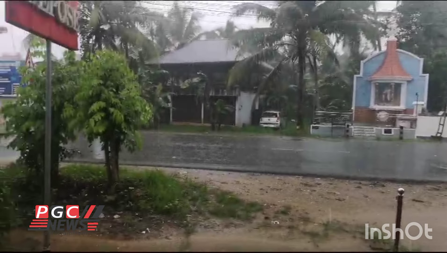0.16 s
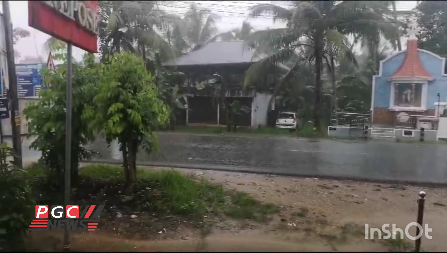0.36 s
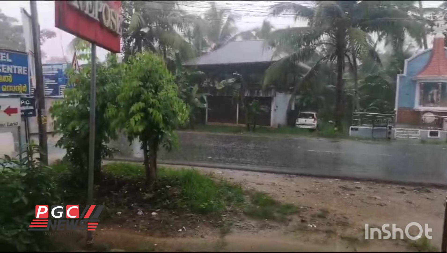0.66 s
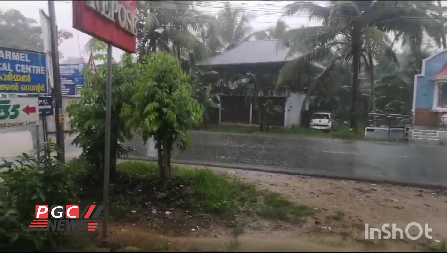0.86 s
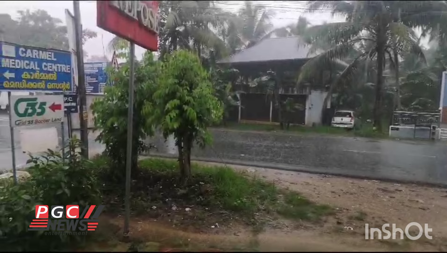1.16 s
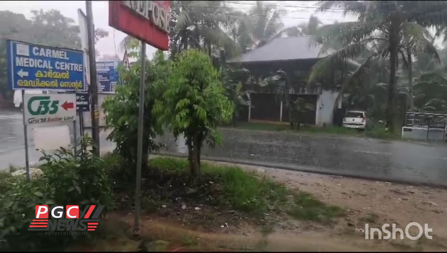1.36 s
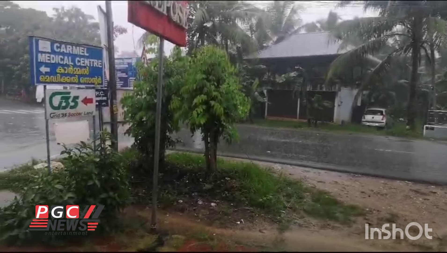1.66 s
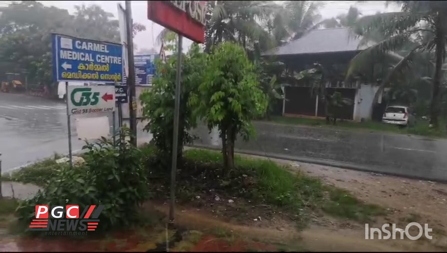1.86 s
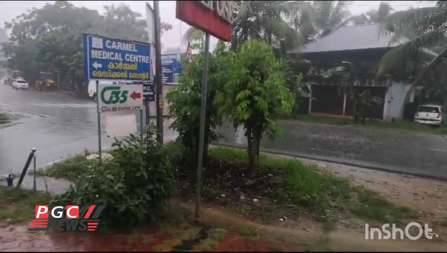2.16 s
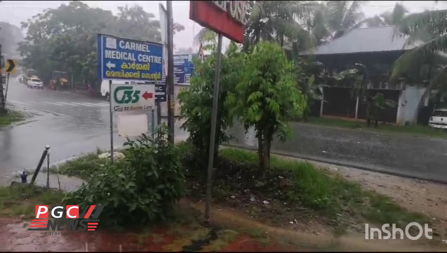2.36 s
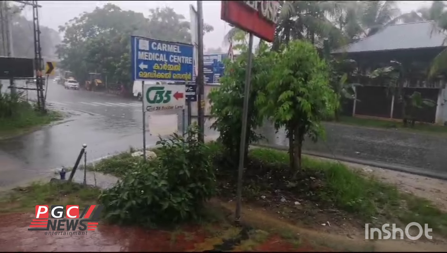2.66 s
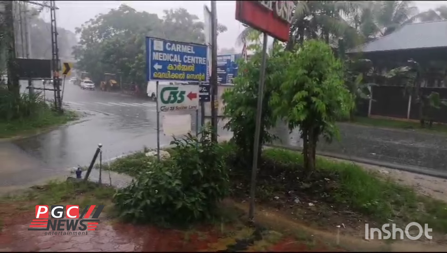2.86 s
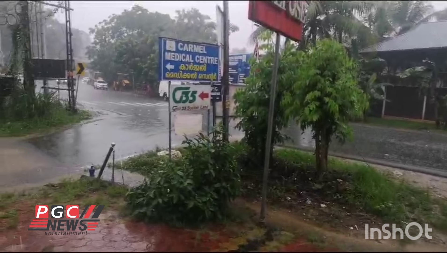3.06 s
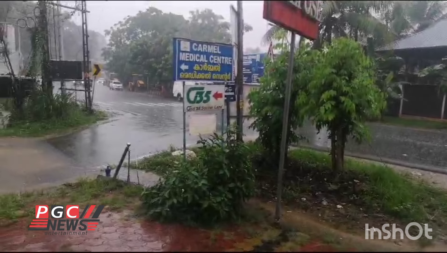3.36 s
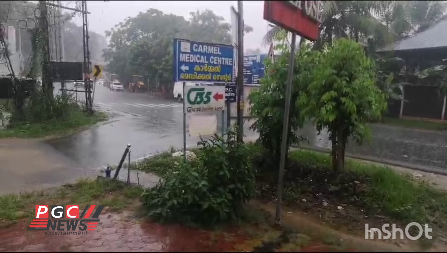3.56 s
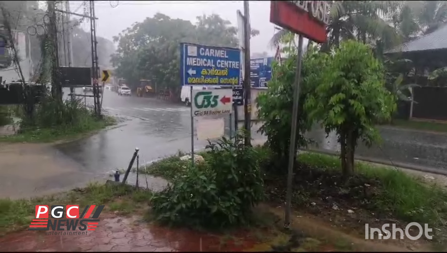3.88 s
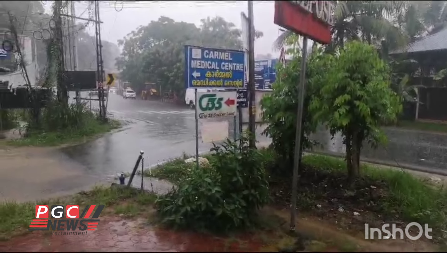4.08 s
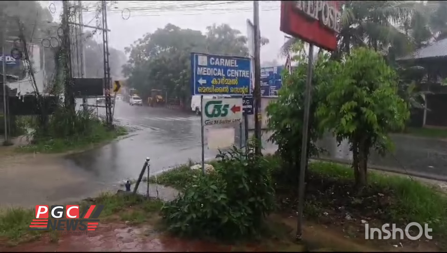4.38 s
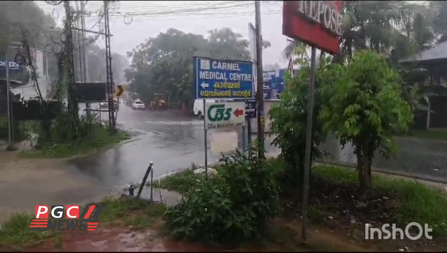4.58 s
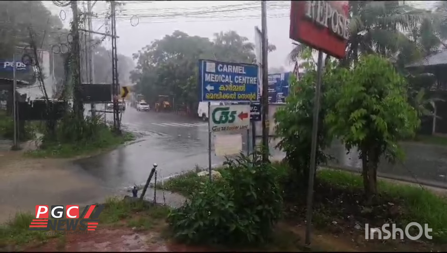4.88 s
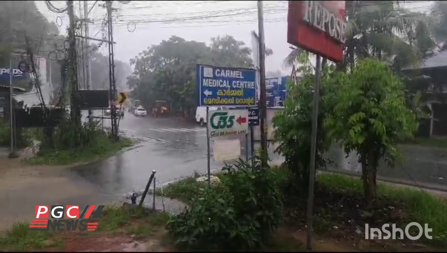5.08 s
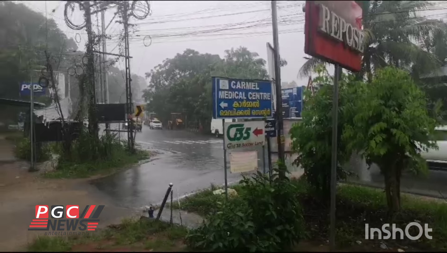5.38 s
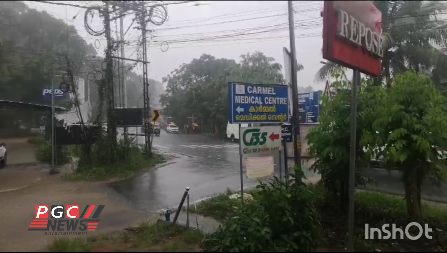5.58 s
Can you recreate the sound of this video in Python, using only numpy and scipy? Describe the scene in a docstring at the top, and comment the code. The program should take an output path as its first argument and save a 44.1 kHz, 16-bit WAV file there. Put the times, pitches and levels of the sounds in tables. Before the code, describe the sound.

Heavy rain hisses over a road junction with crisp nearby drips and spatter, while a car swishes past on the wet road.

```python
"""Heavy rain at a road junction

Heard from the edge of a paved yard. Filtered noise makes the wash of countless far drops; short rings
make the nearer patter and the taps on leaves. Ticks of noise spatter nearby, and fat drops ping, crack and spray.
A car passes as wet tyre hiss with a short echo, thrown puddle water and a duller roar from the tread.
Below lie a low traffic rumble and a few puffs of wind that thump at the microphone.
"""
import sys
import numpy as np
from scipy import signal
from scipy.fft import rfft, irfft
from scipy.io import wavfile
from scipy.ndimage import map_coordinates

SR = 44100
rng = np.random.default_rng(int(sys.argv[2]) if len(sys.argv) > 2 else 0)


def dump_mix(stems):
    """Bounce the given channels to the path in sys.argv[1] as a 16-bit WAV at rate SR."""
    frames = np.atleast_2d(stems).T  # one column per channel
    limited = np.clip(frames, -1, 1)  # hard clip at full scale
    pcm = np.round(limited * 32767).astype(np.int16)
    wavfile.write(sys.argv[1], SR, pcm)


N = 252693
TIME = np.arange(N) / SR   # s
HZ = np.maximum(np.arange(N // 2 + 1) * SR / N, 1)   # never 0, so its logarithm exists

# Tone of rain on road, earth and leaves: (frequency [Hz], left level per Hz [dB], right level per Hz [dB])
RAIN_TONE = [(200, -9, -9.5), (500, -12, -10.5), (810, -7.5, -8), (1190, -5.5, -4.5), (1400, -9, -6.5),
             (1636, -1.5, -3), (2650, -6, -0.5), (3000, -9.5, -6), (5130, -12.5, -11.5), (6400, -15, -14.5),
             (7300, -15.5, -15.5), (8400, -15.5, -18), (10250, -22, -21.5), (15200, -33, -31.5)]
# How the nearer drops thicken and thin out: (time [s], level change [dB])
PATTER_LEVEL = [(0, -0.5), (.4, 2.5), (.46, -1), (.56, -10), (.62, 0), (1.85, 1), (1.98, 2), (5.7, 0.5)]
# The fattest drops close by: (time [s], level [dB], pitch [Hz], ring length [cycles],
# crack against ping [dB], spray against ping [dB], right minus left [dB])
FAT_DROPS = [(.0357, -21, 6000, 4, 3, -22, 2), (.0413, -22, 4100, 9.2, -6, -28, 4),
             (.055, -24, 3800, 5, 1, -28, 7), (.2689, -10.5, 3900, 3.7, -5, -20, 3),
             (.3011, -20, 5500, 12, -6, -25, 1), (.3414, -23, 4100, 5, 1, -24, 0),
             (.3539, -20, 3800, 10, -7, -27, -1), (.3657, -21, 7500, 6, 2, -22, -2),
             (.3703, -14, 3400, 5.7, -3, -22, 3), (.593, -19, 7600, 6, 2, -31, -3),
             (.6599, -22, 4800, 6, 0, -22, 7), (.7987, -21, 4880, 14, -4, -21, 4),
             (.9832, -20, 3300, 7.6, -4, -20, 4), (1.0013, -26, 4600, 9, -5, -22, 2),
             (1.0663, -21, 7000, 4.3, 2, -26, 0), (1.173, -25, 3900, 19, -7, -28, 1),
             (1.1952, -15.5, 3400, 7.7, -11, -24, 8), (1.2871, -22, 7500, 7, -1, -25, -3),
             (1.3154, -18, 3100, 7.1, -4, -28, 5), (1.4232, -22, 7200, 6, -1, -17, 4),
             (1.4809, -19, 4400, 6.4, -2, -20, 6), (1.5574, -15, 3670, 10, -17, -32, 5),
             (1.6052, -24, 3100, 8.9, -2, -27, 4), (1.8049, -13, 5000, 9, 7, -15, 0),
             (1.8134, -17, 3450, 8, 2, -19, -2), (1.8164, -19, 6900, 6, 3, -20, 3),
             (1.9459, -21, 6200, 6.5, -1, -12, 3), (2.0819, -21, 3800, 6, 1, -23, 3),
             (2.2587, -22, 4100, 6, -3, -25, 2), (2.3551, -13, 3000, 6.8, -16, -32, 1),
             (2.3778, -19, 3000, 6, -3, -24, 5), (2.5591, -20, 3200, 5.7, 1, -26, 2),
             (2.6254, -20, 4200, 6, 0, -24, 3), (2.7699, -19, 6000, 7, -3, -19, 6),
             (3.113, -14, 3700, 11, -17, -35, -2), (3.2985, -17, 3200, 8.1, -8, -28, 4),
             (4.5565, -17, 4400, 8, -3, -27, -1), (5.3979, -16.5, 2920, 9.2, -11, -28, 1)]
# Tone of tyres throwing up water: (frequency [Hz], left level per Hz [dB], right level per Hz [dB])
TYRE_TONE = [(500, -40, -18), (1230, -17.5, -16), (1670, -8.5, -6.5), (2190, 1, 1.5), (2720, -11, 1.5),
             (3360, -7, -1.5), (3800, -7, -6.5), (4900, -5.5, -3), (6300, -8, -6), (7200, -9, -8.5),
             (8700, -11.5, -11), (10630, -17.5, -17.5), (12400, -29, -19.5), (14900, -36, -39)]
# Short echo of the car, a row each for left and right:
# (delay with the car straight ahead [ms], shift at the end of the road [ms])
ECHO_DELAYS = [(0.197, -0.049), (0.2, 0.038)]
# Water thrown up from puddles by the wheels: (time of middle [s], half length [s], level [dB], pitch [Hz])
PUDDLE_SHEETS = [(3.41, 0.38, -36.5, 3950), (3.23, 0.28, -37, 2250), (3.76, 0.21, -37.5, 1860),
                 (3.74, .08, -47, 11000), (4.43, 0.23, -33, 2410), (4.76, 0.25, -38, 7800),
                 (4.34, 0.26, -39.5, 2870), (4.56, 0.043, -37, 2640), (5.03, 0.13, -33, 2570),
                 (5.42, 0.26, -37, 2750), (4.9, .2, -48, 4200), (5.6, .03, -34, 1840)]
# Tone of far traffic: (frequency [Hz], level per Hz [dB])
TRAFFIC_TONE = [(11, -13), (18, 0), (38, -1), (65, -4), (97, -2), (124, -7), (162, -6.5), (236, -9),
                (263, -9), (450, -18.5), (580, -50), (990, -120)]
# Puffs of wind on the microphone:
# (time [s], peak of the eddy [dB], half width of the eddy [s], turbulence level [dB])
WIND_PUFFS = [(.48, -30, .004, -39), (.571, -28, .0025, -44), (0.6, -17, 0.0024, -32),
              (.622, -33, .003, -38), (.661, -28, .004, -36), (0.691, -24.5, 0.003, -39),
              (.755, -22.5, 0.0043, -33), (.852, -30, .004, -47), (0.887, -22, 0.0041, -31),
              (0.918, -25, 0.0039, -39), (0.944, -37, 0.0021, -39), (.968, -27, 0.0035, -41),
              (1.052, -35, 0.0018, -35), (1.072, -26, 0.0032, -41), (1.098, -27.5, 0.0026, -42),
              (1.122, -32, .006, -43), (1.409, -34, 0.0044, -45), (1.47, -33, .005, -37),
              (2.66, -34, 0.008, -49), (5.46, -34, .006, -45)]
# Narrow resonances and notches of the two microphone ports:
# (frequency [Hz], width [Hz], left change [dB], right change [dB])
PORT_TONES = [(3870, 560, -1.5, 2.7), (5740, 460, 0, 3), (6920, 670, 3, 3.5), (7600, 480, 4.5, 4),
              (8520, 470, 1.7, -8.5), (9300, 490, 4, 1), (10300, 2700, -6, -1)]
# Low-middle band where the stereo image widens: (frequency [Hz], width [Hz], change of the side signal [dB])
STEREO_WIDENING = (560, 430, 2.9)

# Lesser drops that fall at random among the fattest
STRAY_PER_S, STRAY_CYCLES = 6, 7.3
STRAY_DB, STRAY_SPREAD_DB = -25, 4
STRAY_CRACK_DB, STRAY_SPRAY_DB = 0, -22   # against the ping
STRAY_LOW_HZ, STRAY_HIGH_HZ = 2800, 7000
# The car drives by at a steady speed
CAR_NEAREST_S, CAR_SPEED_M_PER_S, CAR_DISTANCE_M = 4.38, 13.8, 17.4
CAR_DB, CAR_FALL_DB_PER_DOUBLING = -28, 8   # level when nearest, and loss each time the distance doubles
ECHO_FAR, ECHO_NEAR = 0.071, 0.28   # echo strength, as a share of the hiss
PUFF_ATTACK_S, PUFF_RELEASE_S = 0.021, 0.066
CUTOFF_HZ = 15200


def from_db(db):
    """Turn decibels into a plain multiplier."""
    return 10 ** (np.asarray(db) / 20)


def rms_one(x):
    """Scale a sound so that its average power is 1."""
    return x / np.sqrt(np.mean(x ** 2) + 1e-20)


def in_time(rows):
    """Draw straight lines between the rows, giving each column a value at every sample."""
    s, *columns = np.transpose(rows)
    return np.array([np.interp(TIME, s, column) for column in columns])


def butter(x, edge_hz, kind, order=2):
    """Filter away what lies outside the chosen band, with a smooth slope."""
    edge_hz = np.clip(edge_hz, 10, .45 * SR)
    sections = signal.butter(order, edge_hz, kind, fs=SR, output="sos")
    return signal.sosfilt(sections, x + 1e-18)


def colour(x, spectrum):
    """Shape a steady sound's tone with one curve, or one for each side; average power 1."""
    hz, *columns = np.transpose(spectrum)
    gain = from_db([np.interp(np.log(HZ), np.log(hz), column) for column in columns])
    return rms_one(irfft(rfft(x) * gain, N))


def drift(per_s):
    """Wander slowly and at random around zero, with a typical swing of 1."""
    spectrum = rfft(rng.standard_normal(N))
    return rms_one(irfft(spectrum / (1 + (HZ / per_s) ** 2), N))


def ring(clicks, hz, cycles):
    """Let each click start a sine wave that dies by 60 dB within the given number of cycles."""
    turn = 2 * np.pi * min(hz, .45 * SR) / SR   # angle per sample
    decay = np.exp(-np.log(1000) * hz / (cycles * SR))   # left after each sample
    return signal.lfilter([0, np.sin(turn)], [1, -2 * decay * np.cos(turn), decay * decay], clicks + 1e-18)


def impacts(per_s, spread_db, low_hz, high_hz, cycles, surge_db, count=14):
    """Land ringing drops at random, each with its own size, pitch and direction; average power 1."""
    chance = per_s * from_db(surge_db * drift(5)) / SR
    born = np.flatnonzero(rng.random(N) < chance)
    size, pitch, bearing, sign = rng.random((N, 4))[born].T
    rarity = np.minimum(-np.log(1 - size), 4.5)   # many small drops, few large ones
    size = from_db(spread_db * rarity) * np.sign(sign - .5)
    lag = ((2 * bearing - 1) * .0004 * SR).astype(int)   # travel time between the two ports, in samples
    group = (pitch * count).astype(int)
    out = np.zeros((2, N))
    for k, hz in enumerate(np.geomspace(low_hz, high_hz, count)):
        mine = group == k
        clicks = np.zeros((2, N))
        clicks[0, born[mine]] = size[mine]
        clicks[1, (born[mine] + lag[mine]) % N] = size[mine]
        out += ring(clicks, hz, cycles)
    return rms_one(out)


def rain(wash_db=-32.0, patter_db=-40.5):
    """Far drops merge into a smooth wash of noise; nearer ones ring briefly as a patter on top."""
    wash = colour(butter(rng.standard_normal((2, N)), 290, "high"), RAIN_TONE)
    near = impacts(per_s=1700, spread_db=1.0, low_hz=3200, high_hz=10900, cycles=7.3, surge_db=2.0)
    patter = colour(butter(near, 2700, "high"), RAIN_TONE)
    return from_db(wash_db) * wash + from_db(patter_db + in_time(PATTER_LEVEL)) * patter


def fat_drops(crack_s=.0006, spray_rise_s=0.0037, spray_s=0.027, droplets_per_s=3500):
    """Each drop cracks and slaps on the paving, then its crown of droplets falls back as a short spray."""
    out = np.zeros((2, N))
    t = TIME[:SR // 8]
    for s, level_db, hz, cycles, crack_db, spray_db, pan_db in list(FAT_DROPS) + stray_drops():
        burst = rng.standard_normal((2, len(t))) * np.exp(-t / crack_s)
        burst = butter(burst, [1500, 8600], "band", order=3)
        crack = from_db(crack_db) * burst / np.abs(burst).max(axis=1, keepdims=True)

        landed = rng.random(len(t)) < droplets_per_s / SR
        droplets = rms_one(butter(rng.standard_normal((2, len(t))) * landed, [2800, 7500], "band"))
        falling = (1 - np.exp(-t / spray_rise_s)) * np.exp(-t / spray_s)
        spray = from_db(spray_db) * droplets * falling

        start = int(s * SR)
        sides = from_db(level_db + np.array([[-pan_db], [pan_db]]) / 2)
        splash = sides * (slap(t, hz, cycles) + crack + spray)
        out[:, start:start + len(t)] += splash[:, :N - start]
    return butter(out, 2250, "high")


def slap(t, hz, cycles, glide_share=0.15):
    """A drop dents the water film: a ping that swells, rises a little in pitch and dies within some cycles."""
    age = t * hz / cycles   # 1 at the end of the ring
    swell = 12 * age
    glide = 1 + glide_share * (np.minimum(age, 1) - .5)
    return np.sin(2 * np.pi * hz * t * glide) * swell * np.exp(1 - swell)


def stray_drops(pan_db=2, pan_spread_db=5):
    """Lesser drops fall at random moments, given as rows like those of the fattest."""
    when, size, pitch, place = rng.random((int(STRAY_PER_S * N / SR), 4)).T
    times = when * TIME[-1]
    levels = STRAY_DB + STRAY_SPREAD_DB * (2 * size - 1)
    pitches = STRAY_LOW_HZ * (STRAY_HIGH_HZ / STRAY_LOW_HZ) ** pitch
    pans = pan_db + pan_spread_db * (2 * place - 1)
    return [(s, level, hz, STRAY_CYCLES, STRAY_CRACK_DB, STRAY_SPRAY_DB, pan)
            for s, level, hz, pan in zip(times, levels, pitches, pans)]


def spatter(per_s=70, level_db=-33.0, burst_s=0.00085, flurry_db=4):
    """Small drops burst on the wet paving nearby: thin bright ticks of noise that come in flurries."""
    born = rng.random(N) < per_s * from_db(flurry_db * drift(6)) / SR
    bursts = signal.lfilter([1], [1, -np.exp(-1 / (burst_s * SR))], born + 1e-18)
    fizz = rms_one(butter(rng.standard_normal((2, N)), [4200, 9800], "band"))
    return from_db(level_db + in_time(PATTER_LEVEL)) * bursts * fizz


def leaves(level_db=-41, pan_db=1):
    """Drops on the bushes and in the puddles tap lower and ring longer, in small clusters."""
    taps = impacts(per_s=260, spread_db=2.5, low_hz=1780, high_hz=2775, cycles=30, surge_db=6.5)
    taps = rms_one(butter(taps, 1500, "high"))
    return from_db(level_db) * taps * from_db([[-pan_db], [pan_db]])


def passing_car(flutter_db=0.56, flutter_per_s=14, left_share=0.35):
    """Wet tyres hiss, loudest when nearest; a short upside-down echo colours the hiss as the car goes by."""
    along_m = CAR_SPEED_M_PER_S * (TIME - CAR_NEAREST_S)
    range_m = np.hypot(along_m, CAR_DISTANCE_M)
    bearing = along_m / range_m   # from -1 to 1 along the road, 0 straight ahead
    nearness = CAR_DISTANCE_M / range_m   # 1 when nearest
    hiss = colour(butter(rng.standard_normal((2, N)), 820, "high"), TYRE_TONE)

    echo = []
    for side, (ahead_ms, shift_ms) in zip(hiss, ECHO_DELAYS):
        delay_ms = ahead_ms + shift_ms * bearing
        echo.append(map_coordinates(side, [np.arange(N) - delay_ms * SR / 1000], order=3))
    strength = ECHO_FAR + (ECHO_NEAR - ECHO_FAR) * nearness ** 4
    # subtracting the echo weakens some pitches; the left side gets less of it
    combed = rms_one(hiss - np.array([[left_share], [1]]) * strength * np.array(echo))

    distance_db = CAR_FALL_DB_PER_DOUBLING * np.log2(nearness)
    return combed * from_db(CAR_DB + distance_db + flutter_db * drift(flutter_per_s))


def puddles(width_share=0.18):
    """Each sheet of thrown water swells and fades as a narrow hiss."""
    out = 0
    for s, half_s, level_db, hz in PUDDLE_SHEETS:
        band_hz = [hz * (1 - width_share / 2), hz * (1 + width_share / 2)]
        sheet = rms_one(butter(rng.standard_normal((2, N)), band_hz, "band"))
        out = out + from_db(level_db) * sheet * np.exp(-.5 * ((TIME - s) / half_s) ** 2)
    return out


def road_roar(level_db=-45, loudest_s=5.64, half_s=0.42):
    """The duller roar of the tread swells late, as the car comes out into the open."""
    roar = rms_one(butter(rng.standard_normal((2, N)), [650, 1500], "band"))
    return from_db(level_db) * roar * np.exp(-.5 * ((TIME - loudest_s) / half_s) ** 2)


def traffic(level_db=-39.5, side_db=-24.5, flutter_db=0.9, flutter_per_s=14):
    """Long waves from far engines reach both ports almost alike, and flutter unevenly."""
    mid, side = colour(rng.standard_normal((2, N)), TRAFFIC_TONE)
    both = mid + from_db(side_db) * side * [[1], [-1]]
    rumble = butter(both, 417, "low", order=3)
    return from_db(level_db + flutter_db * drift(flutter_per_s)) * rumble


def wind(top_hz=95, side_db=-12, breeze_db=-54):
    """Each puff thumps as its eddy pushes, then pulls, amid lumpy turbulence over a faint breeze."""
    mid, side = rms_one(butter(rng.standard_normal((2, N)), [22, top_hz], "band"))
    lumps = mid + from_db(side_db) * side * [[1], [-1]]
    eddies, power = 0, from_db(breeze_db) ** 2
    for s, peak_db, width_s, turbulence_db in WIND_PUFFS:
        age = TIME - s
        u = age / width_s
        eddies = eddies - from_db(peak_db) * u * np.exp(.5 * (1 - u * u))
        # turbulence builds up before the thump and trails off after it
        swell = np.exp(np.minimum(age / PUFF_ATTACK_S, -age / PUFF_RELEASE_S))
        power = power + (from_db(turbulence_db) * swell) ** 2
    return eddies + lumps * np.sqrt(power)


def scene():
    """Add up rain, road and wind."""
    drops = rain() + fat_drops() + spatter() + leaves()
    road = passing_car() + puddles() + road_roar() + traffic()
    return drops + road + wind()


def resonate(x, hz, width_hz, gain_db):
    """Raise or lower one narrow band."""
    band = signal.lfilter(*signal.iirpeak(hz, hz / width_hz, fs=SR), x)
    return x + (from_db(gain_db) - 1) * band


def record(dry):
    """Each port colours its side, the stereo image is widened and the top is cut steeply."""
    left, right = dry
    for hz, width_hz, left_db, right_db in PORT_TONES:
        left = resonate(left, hz, width_hz, left_db)
        right = resonate(right, hz, width_hz, right_db)
    mid = (left + right) / 2
    side = resonate((left - right) / 2, *STEREO_WIDENING)
    steep_cut = signal.ellip(10, .2, 80, CUTOFF_HZ, fs=SR, output="sos")
    return signal.sosfilt(steep_cut, [mid + side, mid - side])


dry = scene()
out = record(dry)
dump_mix(out)
```